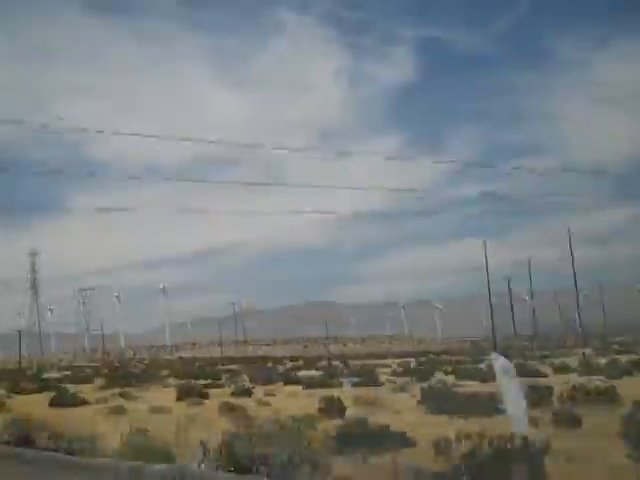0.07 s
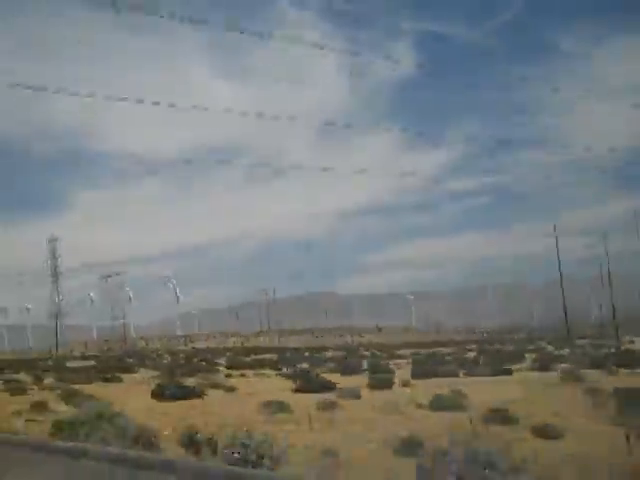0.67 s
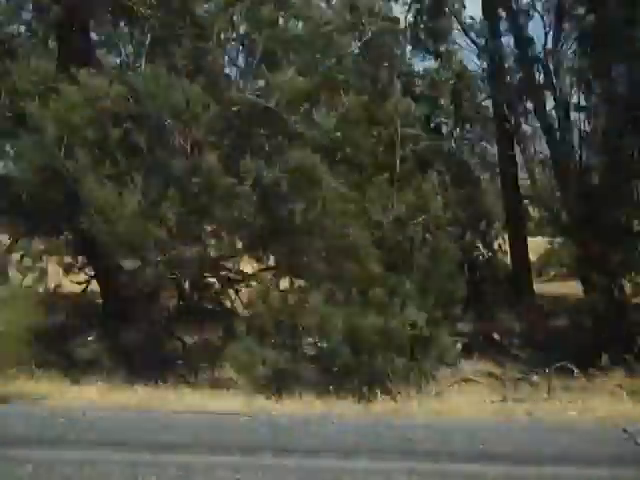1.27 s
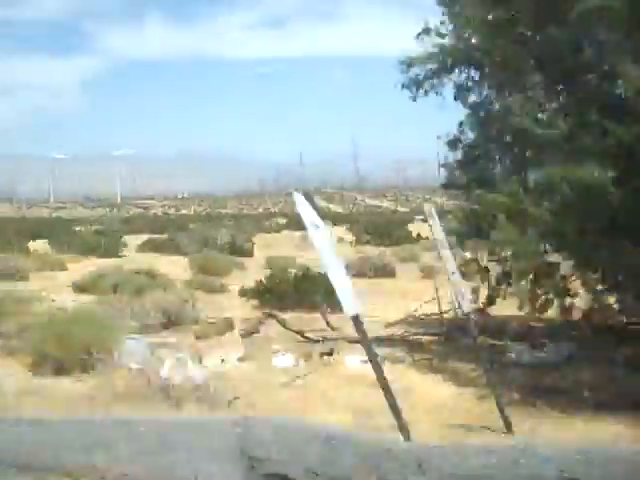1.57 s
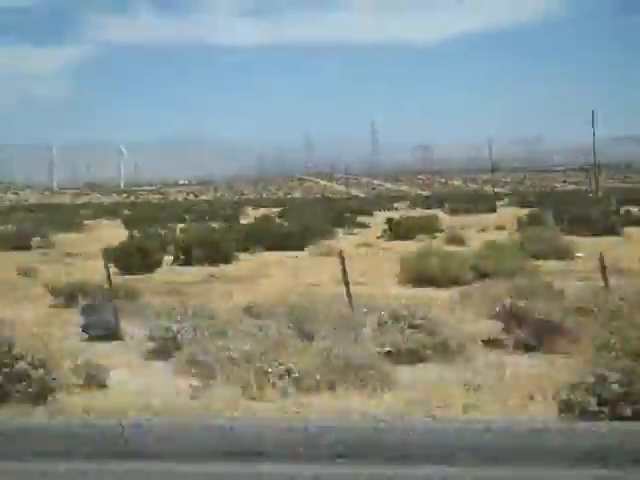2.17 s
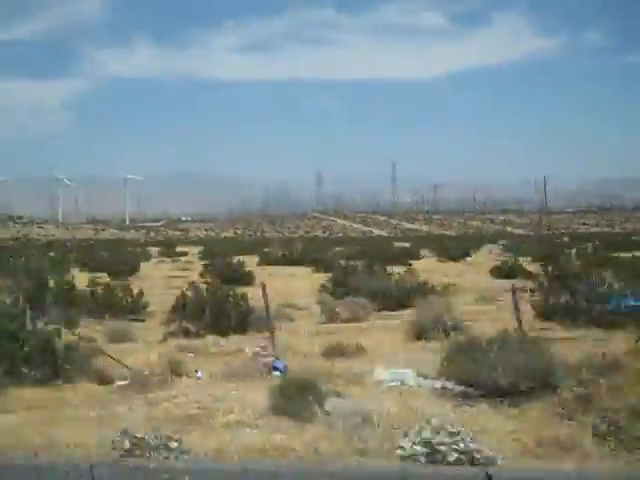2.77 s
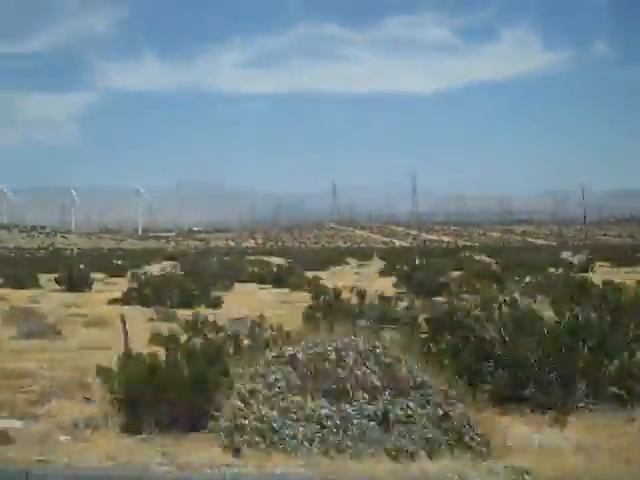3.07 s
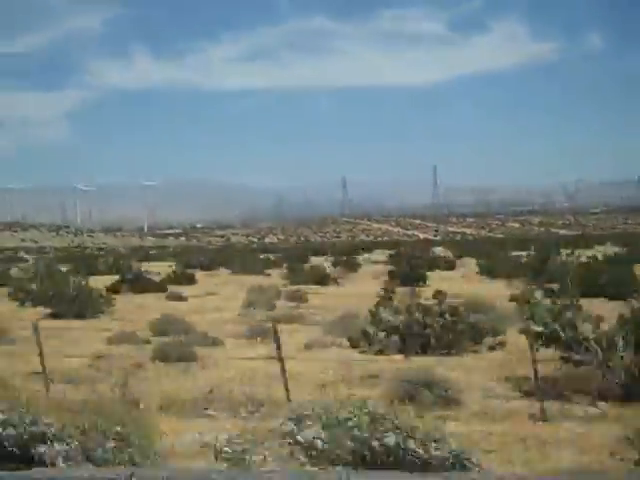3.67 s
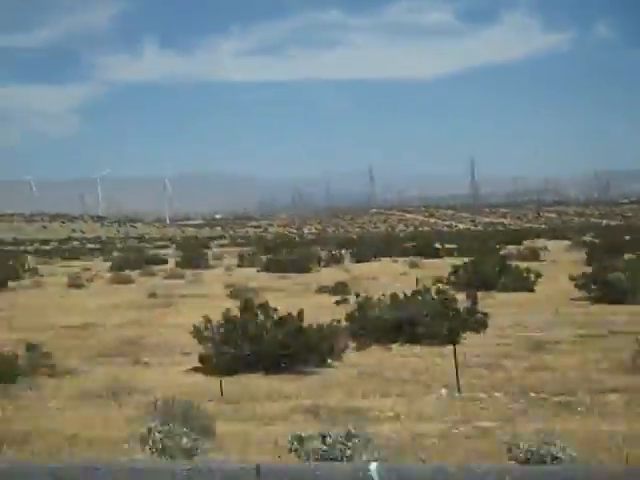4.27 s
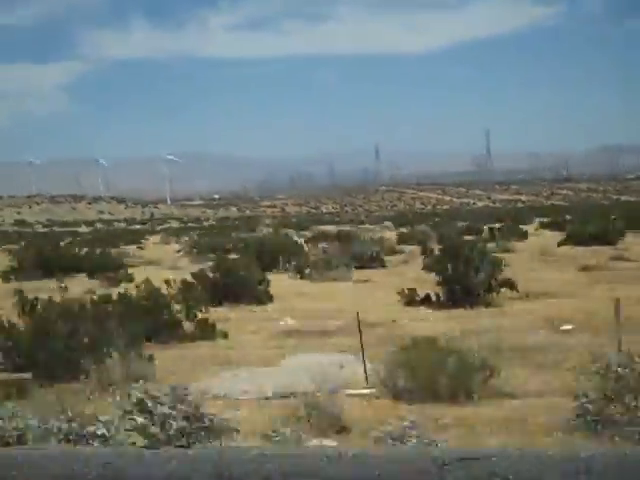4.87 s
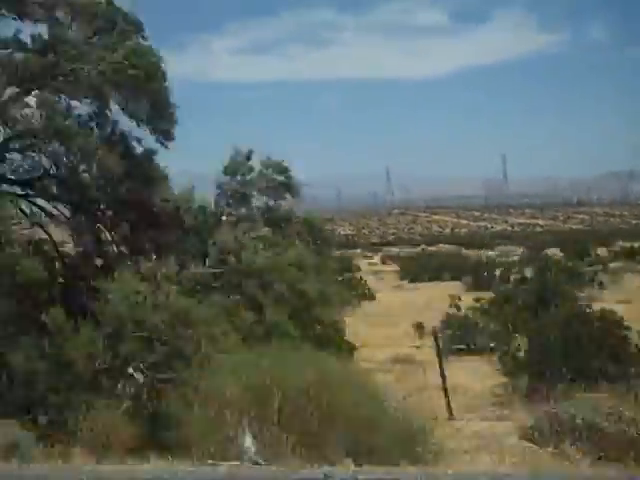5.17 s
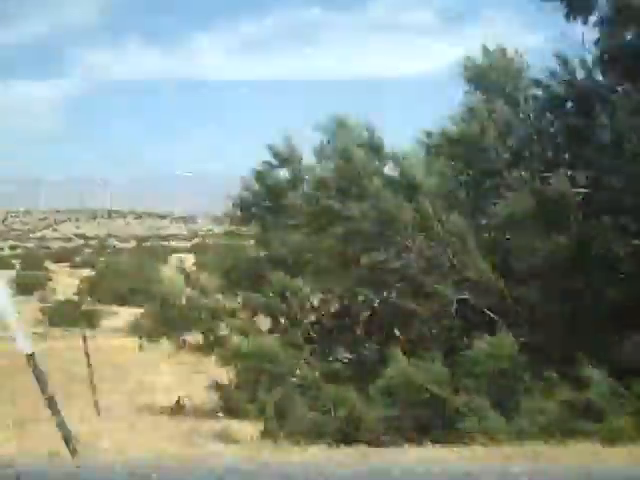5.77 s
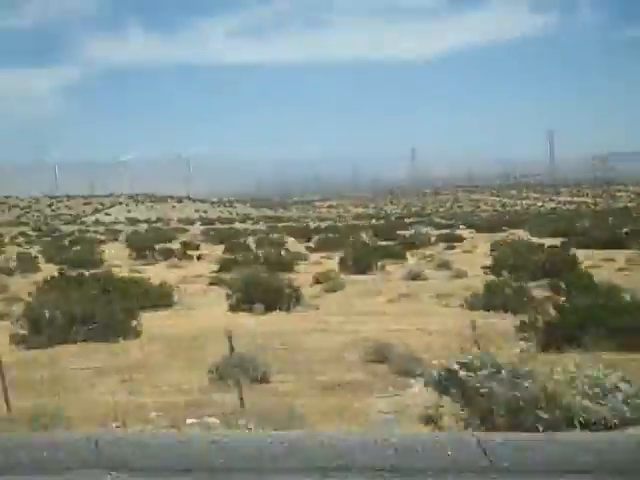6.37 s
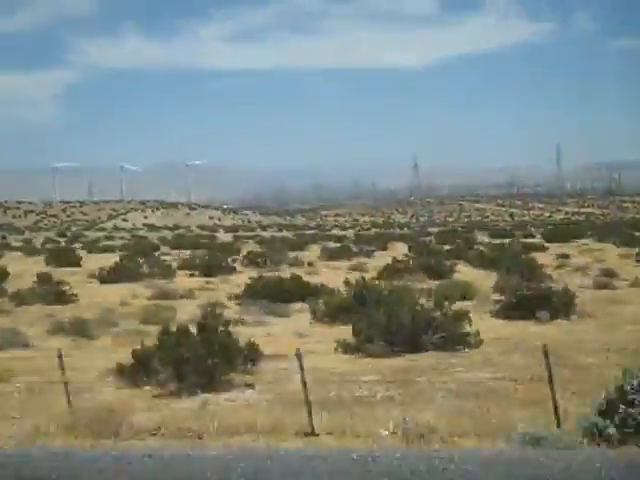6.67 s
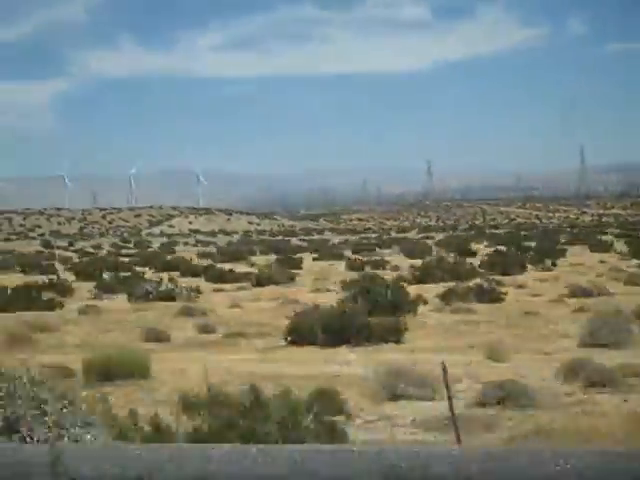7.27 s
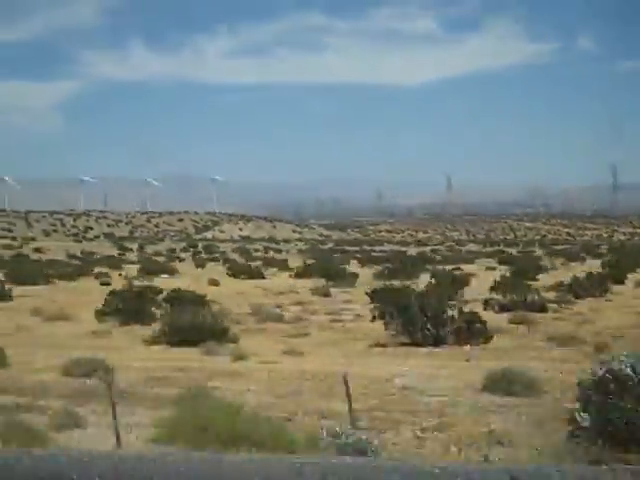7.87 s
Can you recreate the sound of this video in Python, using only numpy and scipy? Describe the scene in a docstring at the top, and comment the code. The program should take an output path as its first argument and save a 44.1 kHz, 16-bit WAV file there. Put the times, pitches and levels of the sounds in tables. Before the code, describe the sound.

Wind buffets the microphone at a moving vehicle's open window, rumbling and hissing in gusts over a low engine drone.

```python
"""Wind buffeting a two-port microphone at an open side window, riding at highway speed through desert scrub.
Close up, eddies rumble, roar and hiss across the ports and whistle in the window opening; behind them
the engine drones and the tyres stir the cabin. After each hard gust the level dips and swells back;
twice the sound cuts out briefly, with a click. Late on, a row of trees goes by with a brighter rush."""
import sys
import numpy as np
from scipy import signal
from scipy.fft import rfft, irfft
from scipy.io import wavfile
from scipy.ndimage import map_coordinates

SR = 44100
rng = np.random.default_rng(int(sys.argv[2]) if len(sys.argv) > 2 else 0)


def dump_mix(stems):
    """Bounce the given channels to the path in sys.argv[1] as a 16-bit WAV at rate SR."""
    frames = np.atleast_2d(stems).T  # one column per channel
    limited = np.clip(frames, -1, 1)  # hard clip at full scale
    pcm = np.round(limited * 32767).astype(np.int16)
    wavfile.write(sys.argv[1], SR, pcm)


N = 349272
TIME = np.arange(N) / SR
BINS = np.maximum(np.arange(N // 2 + 1) * SR / N, 1)


def from_db(db):
    """Decibels to gain."""
    return 10 ** (np.asarray(db) / 20)


def rms_one(x):
    """Scale to unit power."""
    return x / np.sqrt(np.mean(x ** 2) + 1e-20)


def in_time(rows):
    """Each column of a curve table at every sample."""
    times, *columns = np.transpose(rows)
    return [np.interp(TIME, times, column) for column in columns]


def gain_over_hz(points):
    """A (frequency, level) table as a gain at every frequency."""
    hz, db = np.transpose(points)
    return from_db(np.interp(np.log(BINS), np.log(hz), db))


def bell(s, length):
    """A smooth swell peaking at time s."""
    return np.exp(-(2 * (TIME - s) / length) ** 2)


def low_pass(x, hz):
    """Steep cut of everything above hz."""
    return signal.sosfilt(signal.ellip(8, .2, 70, hz, fs=SR, output="sos"), x)


def white():
    """The spectrum of fresh white noise."""
    return rfft(rng.standard_normal(N))


def drift(hz):
    """Random wandering of unit power, mostly slower than hz."""
    return rms_one(irfft(white() / (1 + (BINS / hz) ** 2), N))


def churn(eddies, depth_db):
    """Eddies swell and thin a sound without changing its mean power."""
    return rms_one(from_db(depth_db * np.clip(eddies, -2, 2)))


def resonant_noise(hz, width_hz):
    """Noise ringing in one resonance, unit power."""
    return rms_one(irfft(white() / (1 + 1j * (BINS ** 2 - hz ** 2) / (BINS * width_hz)), N))


def resonances(modes, wander, swell_db):
    """Noise rings in modes that stray in pitch together and each swell on their own."""
    clock = TIME + wander * np.cumsum(drift(hz=3.0)) / SR
    ringing = sum(from_db(db) * resonant_noise(hz, width) * churn(drift(hz=6.9), swell_db)
                  for hz, width, db in modes)
    return map_coordinates(ringing, [clock * SR], order=1, mode="mirror")


# Share of the wind that each microphone port hears alone: (frequency [Hz], share [dB])
PORT_OWN_SHARE = [(30, -16.5), (100, -17.5), (300, -17), (600, -13.5), (1200, -11.5), (2500, -1),
                  (6000, -2.5), (9000, -3)]
# Balance across the microphone: (frequency [Hz], left minus right [dB])
PORT_BALANCE = [(12, -9.5), (30, -5), (70, -2.5), (150, -0.8), (300, -1.5), (600, 0), (1500, -1.2),
                (6300, -2), (7100, 0.5), (7900, 4.5), (9000, -1)]
def at_ports(colour, lag_s=.00009):
    """Coloured noise at two ports: a shared part, later on the left, plus each port's own turbulence."""
    own = np.clip(gain_over_hz(PORT_OWN_SHARE), 0, 1)
    shared = white() * np.sqrt(1 - own ** 2)
    lean = np.sqrt(gain_over_hz(PORT_BALANCE))
    left = (shared * np.exp(-2j * np.pi * BINS * lag_s) + own * white()) * lean
    right = (shared + own * white()) / lean
    return rms_one(irfft(np.array([left, right]) * gain_over_hz(colour), N))


# Deepest wind, right on the microphone: (frequency [Hz], relative level [dB])
RUMBLE_COLOUR = [(8, 1.5), (18, 13.5), (30, 5.5), (47, 6), (59, 6.5), (85, -12.5), (160, -67.5)]
# Its rise and fall along the road: (time [s], level [dB])
RUMBLE_SWELL = [(0, 3.5), (.55, 4), (1.3, -1.5), (1.8, 3), (2.6, 1.5), (3.4, 1.5), (4.3, 1.5), (4.9, -5),
                (5.4, 0.5), (5.9, 0), (7.92, -2.5)]
def rumble():
    """The largest eddies rumble over the ports."""
    return from_db(-17.5 + in_time(RUMBLE_SWELL)[0]) * at_ports(RUMBLE_COLOUR)


# Low wind, right on the microphone: (frequency [Hz], relative level [dB])
BUFFET_COLOUR = [(45, -10.5), (68, -8.5), (105, 2.5), (135, -2.5), (175, -4.5), (225, -9.5), (280, -11),
                 (370, -15.5), (480, -29), (800, -39), (2000, -74)]
def buffet(blow_db, eddies):
    """Large eddies beat against the ports."""
    return from_db(-15 + blow_db) * at_ports(BUFFET_COLOUR) * churn(eddies, depth_db=1.3)


ROAR_DB = -28.5
# Midrange wind, close up: (frequency [Hz], relative level [dB])
ROAR_COLOUR = [(220, -18.5), (420, 3), (560, 0.5), (740, -2), (900, -5.5), (1300, -10.5), (2100, -15.5),
               (2600, -29.5), (4000, -28.5), (9000, -68.5)]
def roar(blow_db, eddies):
    """Smaller eddies roar past the ports."""
    return from_db(ROAR_DB + blow_db) * at_ports(ROAR_COLOUR) * churn(eddies, depth_db=1.32)


def port_sizzle(flicker_db):
    """Air rings the ports' treble resonance in quick flickers, mostly on the left."""
    ring = resonant_noise(hz=7910, width_hz=900) * churn(drift(hz=21), flicker_db)
    return ring * from_db([[-5], [-13]])


# Treble wind, right on the microphone: (frequency [Hz], relative level [dB])
HISS_COLOUR = [(1200, -8.5), (2200, 4), (2900, 4.5), (4200, -0.5), (5200, -1.5), (5900, 1), (6600, 2),
               (7500, 0), (8200, 0.5), (8800, -11.5), (9500, -38.5)]
# Port sizzle mixed into that hiss: (time [s], level [dB])
SIZZLE_LEVEL = [(0, -1), (1.0, -1), (1.25, -20), (1.9, -2.5), (2.6, -10.5), (5.4, -9.5), (5.8, -19.5),
                (6.2, -10), (7.92, -6.5)]
def hiss(blow_db, eddies):
    """The smallest eddies hiss across the ports and set them sizzling."""
    sizzle = from_db(in_time(SIZZLE_LEVEL)[0]) * port_sizzle(flicker_db=4.5)
    treble = rms_one(at_ports(HISS_COLOUR) + sizzle)
    flutter = churn(eddies + 0.22 * drift(hz=43), depth_db=1.9)
    return from_db(-42 + blow_db) * treble * flutter


# Resonances of the window opening, close by: (frequency [Hz], width [Hz], level [dB])
WHISTLE_MODES = [(1520, 55, -25.5), (2100, 130, -25.5)]
# Extra blow across the window's edge: (time [s], level [dB])
WINDOW_BLOW = [(0, 9.5), (.8, 9.5), (1.5, -7.5), (5.0, -8), (5.7, 5), (6.7, -1), (7.9, 0)]
def whistles(force_db):
    """Air blowing across the opening draws breathy whistles from it."""
    level_db = ROAR_DB + force_db + in_time(WINDOW_BLOW)[0]
    return from_db(level_db) * resonances(WHISTLE_MODES, wander=.012, swell_db=2.5)


# Wind at the open window: (time [s], force [dB], extra buffet [dB], extra hiss [dB])
WINDOW_WIND = [(0.0, 3.5, -5, 0.5), (0.24, 4, 0.5, -3), (0.37, -1, -4, -0.5), (0.52, 4, -2.5, -3),
               (0.8, 1, -0.5, 0.5), (1.03, 4.5, -3.5, -3), (1.14, 5.5, -1.5, -0.5), (1.27, 4, -1, 2),
               (1.33, -3.5, 0.5, 3), (1.38, 1, 1, 2), (1.5, 2.5, -0.5, 0), (1.62, 1.5, 1, 2),
               (1.88, 0, -0.8, -1), (2.19, 1.4, 0, 1), (2.42, 3, 1.5, 2), (2.61, 5, -1, 2),
               (2.76, 0.1, -0.7, 0.2), (3.0, 1.4, 2, 0.5), (3.25, -1.5, -2, 0.3), (3.42, -3.5, 2, -0.2),
               (3.66, 1.3, -0.3, 1), (3.88, 1.5, 0, 0), (4.1, -2.6, 6.5, -1.5), (4.27, -5, -1.5, -3.5),
               (4.39, 0.5, 5, 3.2), (4.6, -2.5, 0, -6.5), (4.97, 0, 3, 3), (5.28, -1.5, 0, -0.5),
               (5.5, 1.4, 2, 2), (5.72, 0, 0, 3.5), (5.95, -2, 1, 0), (6.2, -1.5, 2.5, 1),
               (6.4, -2, 2, 0.8), (6.55, -1, 3, 3.5), (6.72, -1.5, 2, 0.5), (6.97, -1.5, 2.5, 4),
               (7.2, -3, 3, 0.5), (7.45, -3, 3.5, 0.5), (7.7, -1, 1.2, 2), (7.92, -3.5, 0, -2)]
def airstream():
    """Over the rumble, one force drives buffet, roar and hiss, and the same eddies shake them."""
    force_db, bass_db, treble_db = in_time(WINDOW_WIND)
    blow_db = force_db + gusts_db()
    eddies = rms_one(drift(hz=17) + 0.67 * drift(hz=99))
    deep = rumble()
    low = buffet(blow_db + bass_db, eddies)
    rush = roar(blow_db + shoves_db(), eddies) + hiss(blow_db + treble_db, eddies)
    return deep, low, rush + whistles(force_db) + hollow_bark()


# The engine, heard from inside the cabin: (time [s], pitch [Hz], level [dB])
ENGINE_TONE = [(0, 73.3, -30), (1.2, 73.55, -17.5), (2.2, 74.06, -13), (3, 74, -15.5), (4, 73.5, -18.5),
               (5, 73.5, -15.5), (6, 73.24, -17), (7, 73.3, -17), (7.92, 72.8, -21)]
def engine_drone(waver_hz, waver_db):
    """The engine's firing rate booms in the cabin as one slightly wavering tone."""
    pitch_hz, level_db = in_time(ENGINE_TONE)
    phase = 2 * np.pi * np.cumsum(pitch_hz + waver_hz * drift(hz=11.2)) / SR
    return from_db(level_db + waver_db * drift(hz=2.3)) * np.sin(phase)


# Resonances of the cabin around the microphone: (frequency [Hz], width [Hz], level [dB])
CABIN_MODES = [(111.3, 13, -30), (206.3, 11, -32), (283.7, 15, -35.5), (381.4, 16, -33.5), (750, 35, -42.5)]
# Shaking from the road below: (time [s], level [dB])
ROAD_SHAKE = [(0, -4.5), (1.3, -2), (1.7, 2.5), (2.6, 2.5), (3.4, -1.5), (4.1, 1), (4.8, 1), (5.6, 0),
              (6.6, -3), (7.2, -2.5), (7.92, -3)]
def tyres():
    """The tyres stir the cabin's resonances, more so on rough road."""
    return from_db(in_time(ROAD_SHAKE)[0]) * resonances(CABIN_MODES, wander=.02, swell_db=0.4)


# Hard gusts straight onto the microphone: (time of the dip [s], depth of the dip [dB])
HARD_GUSTS = [(0.018, 10), (0.832, 12.5), (1.39, 24.5), (1.9, 12.5), (2.225, 16), (3.006, 11.5), (3.466, 5),
              (3.894, 11.5), (4.428, 5.5), (4.513, 9.5), (5.118, 12.5), (5.596, 7), (5.877, 11),
              (6.588, 1.5), (6.787, 3), (7.019, 10.5), (7.474, 13.5)]
def gusts_db(rise_per_dip=0.12, lead_s=0.031, length_s=0.048):
    """Each gust peaks just before its dip; the harder the gust, the deeper the dip."""
    return sum(rise_per_dip * depth * bell(s - lead_s, length_s) for s, depth in HARD_GUSTS)


def dip_db(fall_s, hold_s, recovery_db_per_s, ease_db):
    """After each gust the level falls fast, holds and eases back up; the deepest dip counts."""
    dips = []
    for s, depth in HARD_GUSTS:
        fall = np.clip((TIME - s) / fall_s + .5, 0, 1)
        recovered_db = recovery_db_per_s * np.maximum(TIME - s - hold_s, 0)
        remaining_db = ease_db * np.logaddexp((depth - recovered_db) / ease_db, 0)
        dips.append(-fall * remaining_db)
    return np.min(dips, axis=0)


# Shoves of air at the microphone: (time [s], change of the roar [dB], length [s])
AIR_SHOVES = [(.81, 2.5, .04), (1.366, 2.5, 0.03), (1.868, -2.5, .04), (2.19, 0, .05), (2.567, 1, .06),
              (3.455, 3, .03), (4.392, 4, 0.054), (4.99, 3.5, 0.078), (5.5, 1, .06), (6.192, 3.5, .04),
              (6.567, 2, .025), (6.925, 5, .03), (6.975, 1, .06)]
def shoves_db():
    """Hard shoves of air swell the midrange roar for a moment; once it slackens instead."""
    return sum(db * bell(s, length) for s, db, length in AIR_SHOVES)


# Pressure swings all through the cabin: (time [s], level [dB], half-length [s], frequency [Hz])
CABIN_HEAVES = [(0.874, -32, .06, 7.8), (1.178, -19, 0.033, 10), (1.47, -17, 0.046, 12),
                (3.152, -8.5, 0.054, 10), (4.195, -7, 0.024, 24), (4.519, -9, 0.097, 13),
                (7.143, -16.5, 0.04, 34), (7.515, -36, 0.041, 10)]
def heaves():
    """The air in the cabin swings once or twice, almost below hearing."""
    return sum(from_db(db) * bell(s, 2 * half_length) * np.sin(2 * np.pi * hz * (TIME - s))
               for s, db, half_length, hz in CABIN_HEAVES)


# Sharp clicks, dead centre: (time [s], level [dB])
SHARP_CLICKS = [(1.0974, -12), (1.1358, -1)]
def clicks(relax_s):
    """Each click is a sudden step that relaxes at once."""
    return sum(from_db(db) * (TIME >= s) * np.exp(-np.abs(TIME - s) / relax_s) for s, db in SHARP_CLICKS)


# Brief cut-outs on both channels: (start [s], end [s], depth [dB])
BRIEF_CUTOUTS = [(1.101, 1.1216, 29), (1.18, 1.2185, 21.5)]
def cutout_db(edge_s):
    """The sound drops away and returns at once."""
    return sum(np.interp(TIME, [start - edge_s, start + edge_s, end - edge_s, end + edge_s],
                         [0, -depth, -depth, 0]) for start, end, depth in BRIEF_CUTOUTS)


# Fiercest blasts at the window: (time [s], level [dB], length [s]); zero length is silent
WINDOW_BLASTS = [(1.158, -22, 0), (1.24, -27.5, 0.12), (1.371, -26.5, -0.04)]
# Hollow resonances of the opening, close by: (frequency [Hz], width [Hz], level [dB])
HOLLOW_MODES = [(302, 60, -3), (433, 38, -4), (750, 55, -7.5)]
def hollow_bark():
    """The fiercest blasts boom hollowly in the window opening."""
    swell = sum(from_db(db) * bell(s, length) for s, db, length in WINDOW_BLASTS if length)
    return swell * resonances(HOLLOW_MODES, wander=.04, swell_db=3.5)


# Spits of air right on the microphone: (time [s], level [dB], length [s])
AIR_SPITS = [(1.882, -42, 0.033), (2.403, -39.5, 0.022), (3.796, -34.5, 0.013), (5.019, -32.5, 0.0072),
             (5.502, -39, .025), (6.046, -39.5, 0.02), (6.184, -38, 0.011), (6.223, -34, 0.027),
             (6.494, -36.5, 0.023), (6.553, -37, 0.016)]
def spits(hiss_db):
    """Air spits across the ports in bright bursts of sizzle and hiss."""
    swell = sum(from_db(db) * bell(s, length) for s, db, length in AIR_SPITS)
    return swell * (port_sizzle(flicker_db=3) + from_db(hiss_db) * at_ports(HISS_COLOUR))


# Roadside trees, heard through the window: (time [s], centre frequency [Hz], level [dB])
PASSING_TREES = [(5.58, 2360, -62), (5.66, 2387, -40), (5.76, 2385, -49), (5.85, 2390, -44),
                 (5.95, 2460, -52), (6.12, 2350, -58), (6.6, 2700, -56.5), (7.0, 2400, -60)]
def tree_rush(spread_hz, upper_ratio, upper_spread_hz, upper_db):
    """Trees rush by: a breathy band of noise and a wider one about an octave above."""
    centre_hz, level_db = in_time(PASSING_TREES)
    phase = 2 * np.pi * np.cumsum(centre_hz) / SR
    lower, upper = [drift(hz) * np.cos(ratio * phase) + drift(hz) * np.sin(ratio * phase)
                    for ratio, hz in ((1, spread_hz), (upper_ratio, upper_spread_hz))]
    return from_db(level_db) * (lower + from_db(upper_db) * upper)


def scene():
    """Wind and cabin dip together at the microphone; drone and rumble give way less."""
    deep, low, rush = airstream()
    dip = dip_db(fall_s=0.015, hold_s=0.047, recovery_db_per_s=54, ease_db=1.63)
    cut = cutout_db(edge_s=0.0016)
    engine = from_db(0.74 * dip) * engine_drone(waver_hz=0.43, waver_db=0.1)
    cabin = (engine + from_db(dip) * tyres()) * from_db([[-.7], [.7]])   # a little to the right
    bass = from_db(0.52 * dip) * deep + from_db(dip) * low
    trees = tree_rush(spread_hz=360, upper_ratio=2.15, upper_spread_hz=500, upper_db=-6.0)
    air = from_db(dip) * (rush + trees)
    ride = from_db(cut) * (air + cabin) + from_db(1.3 * cut) * bass   # cut-outs bite hardest in the bass
    return low_pass(ride + heaves() + spits(hiss_db=-2.0), hz=9250) + clicks(relax_s=0.00049)


def record(dry):
    """The highest peaks are rounded and the top is cut."""
    rounded = dry / (1 + (dry / .98) ** 4) ** .25
    return low_pass(rounded, hz=10900)


dry = scene()
out = record(dry)
dump_mix(out)
```